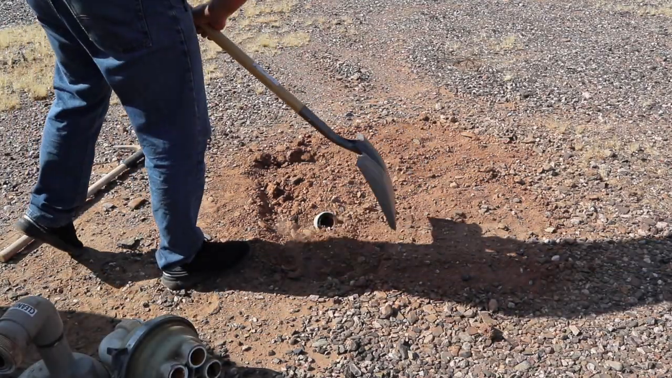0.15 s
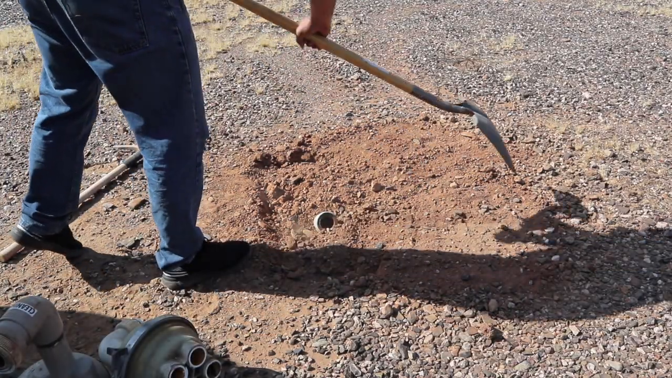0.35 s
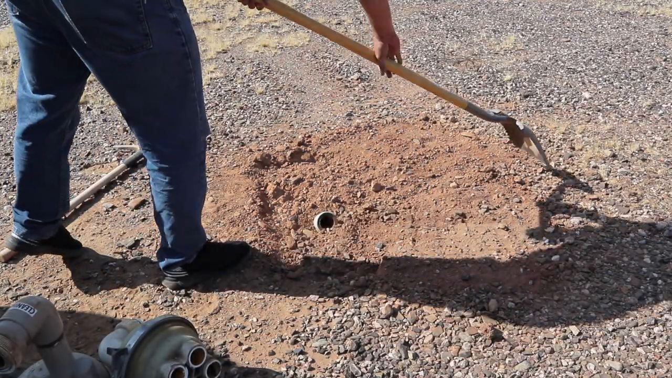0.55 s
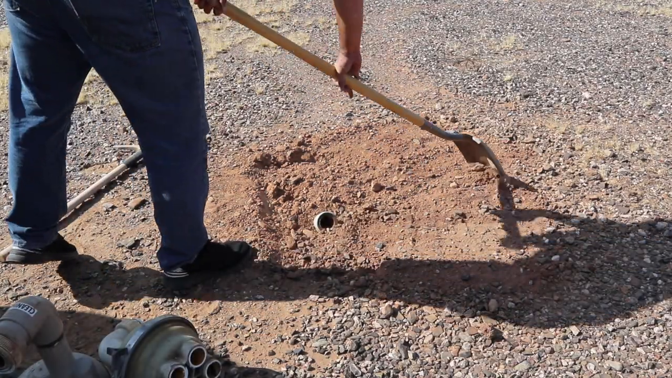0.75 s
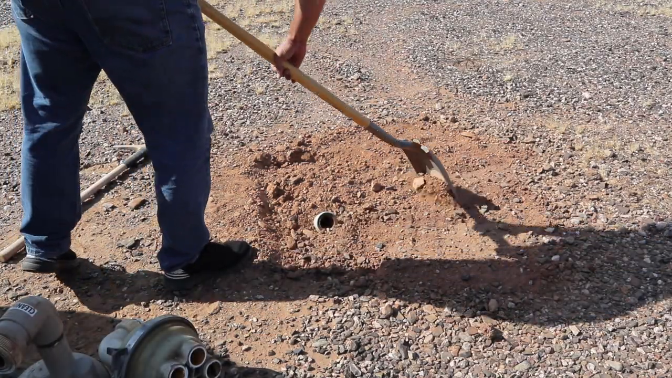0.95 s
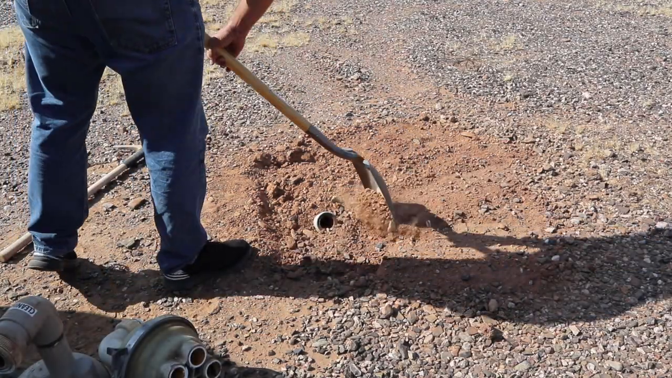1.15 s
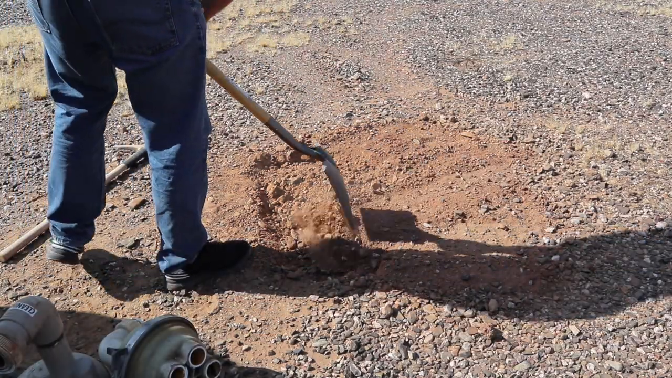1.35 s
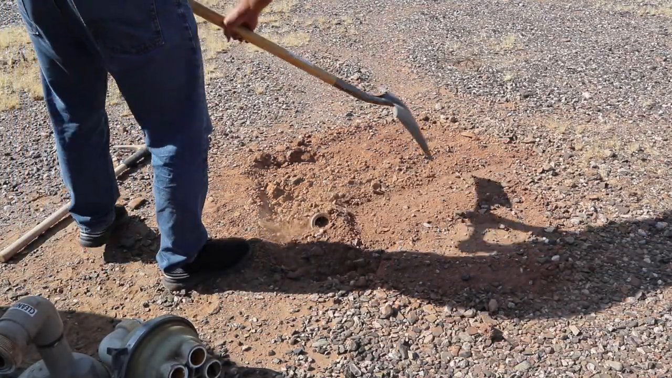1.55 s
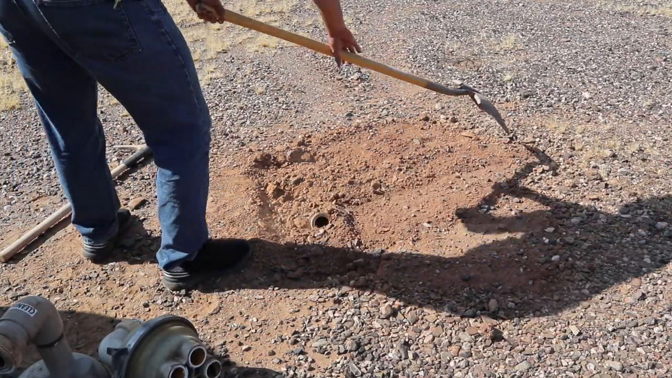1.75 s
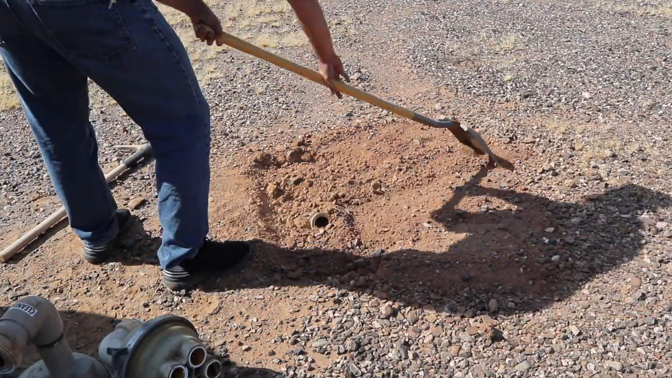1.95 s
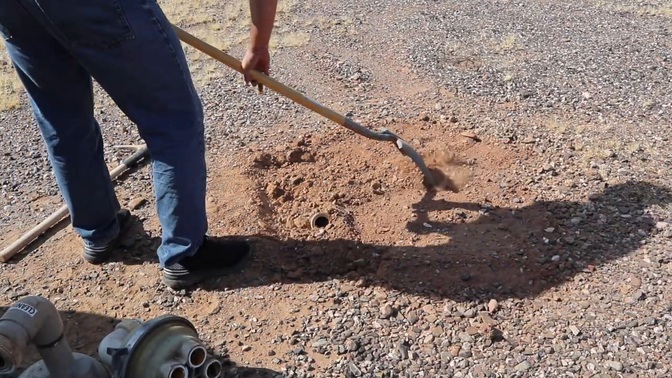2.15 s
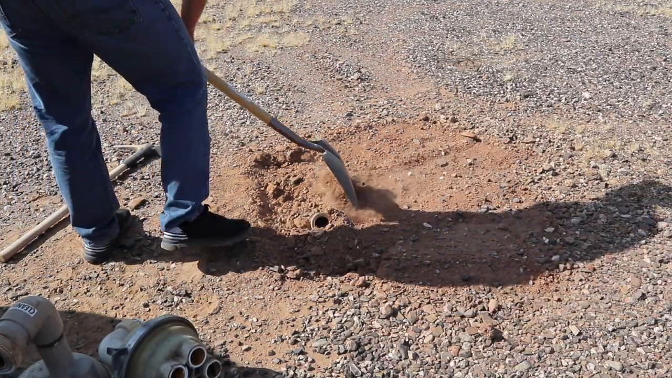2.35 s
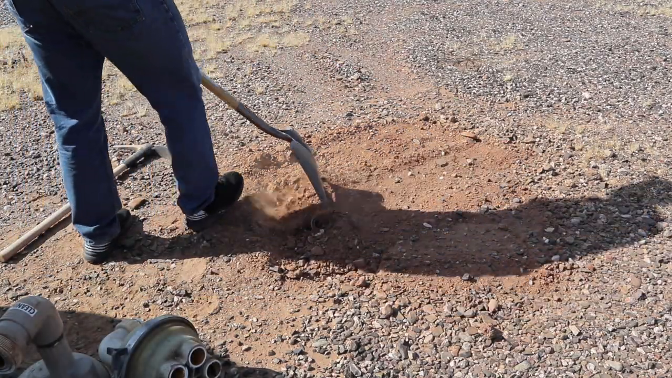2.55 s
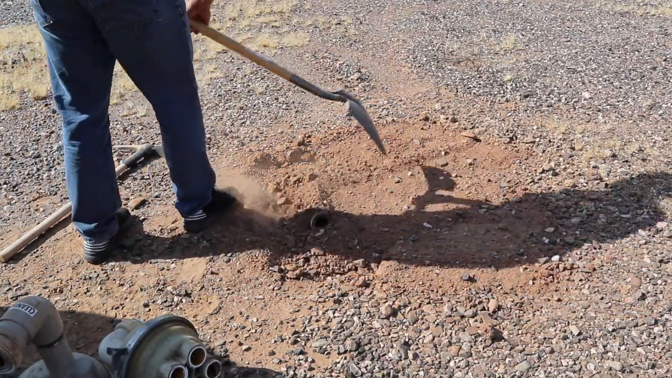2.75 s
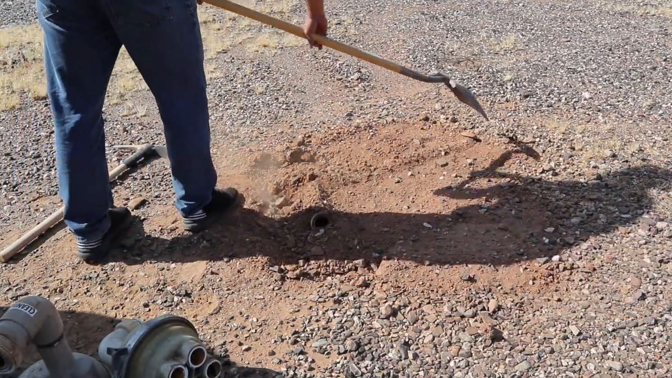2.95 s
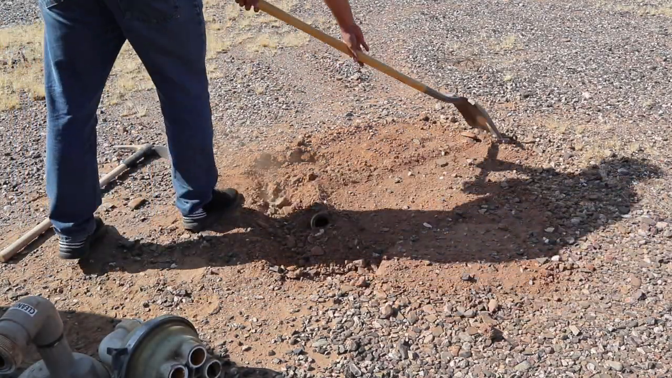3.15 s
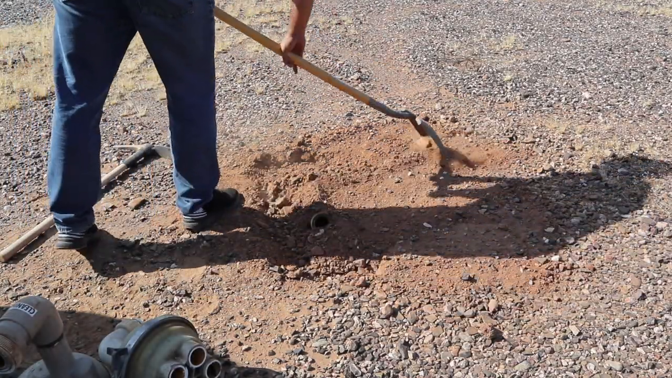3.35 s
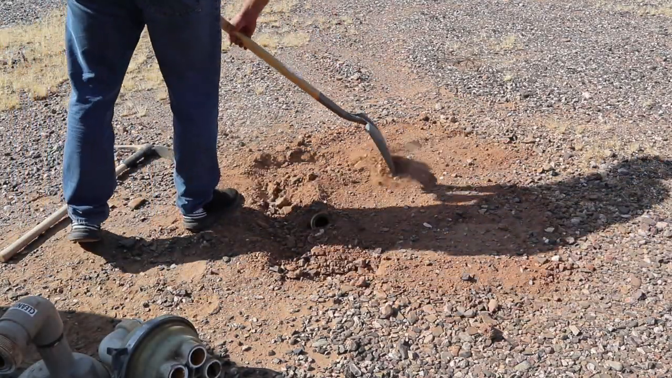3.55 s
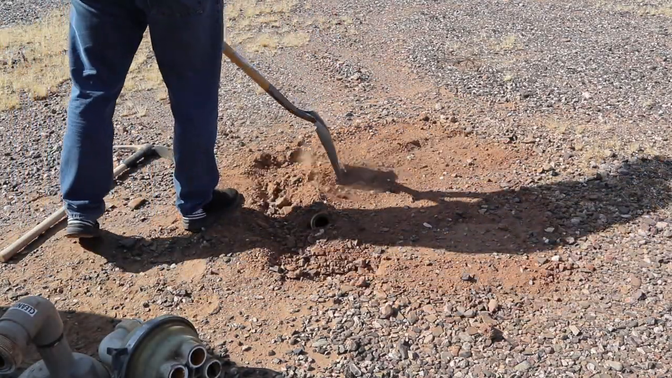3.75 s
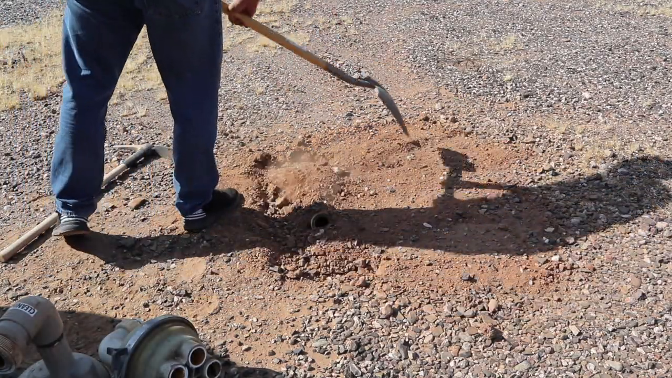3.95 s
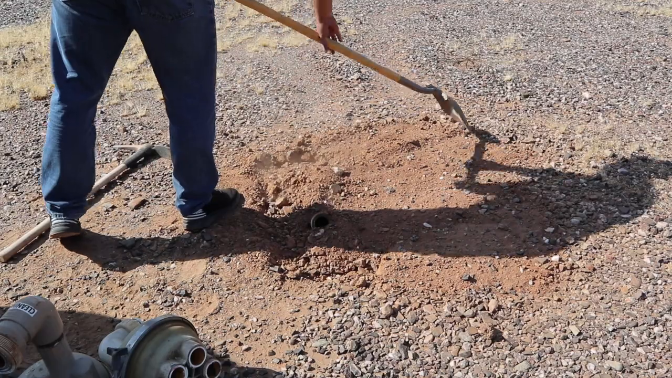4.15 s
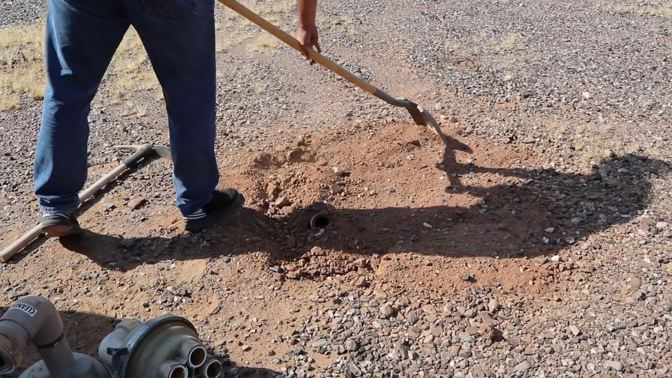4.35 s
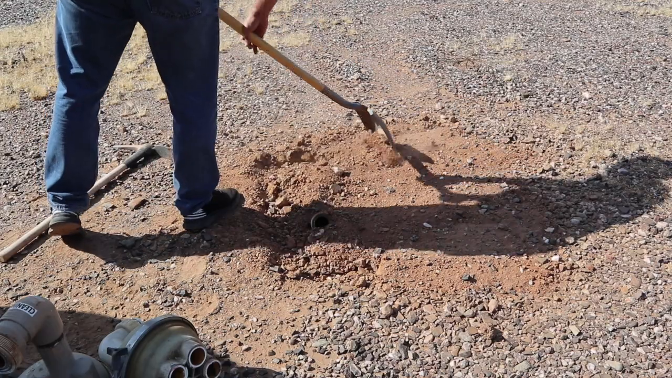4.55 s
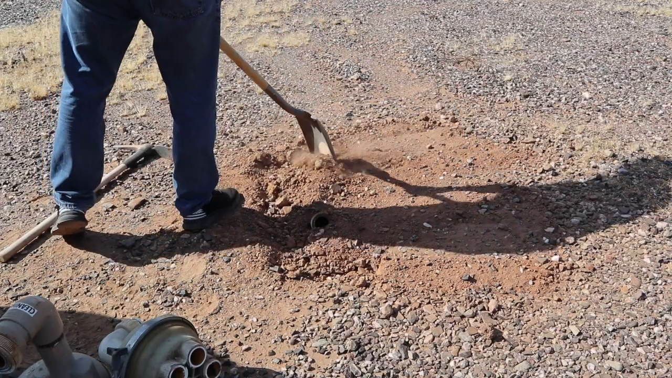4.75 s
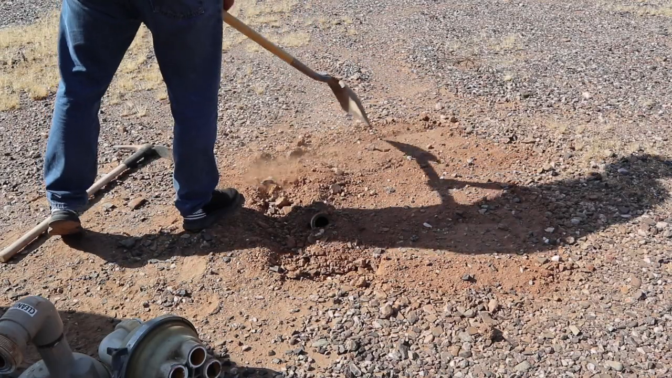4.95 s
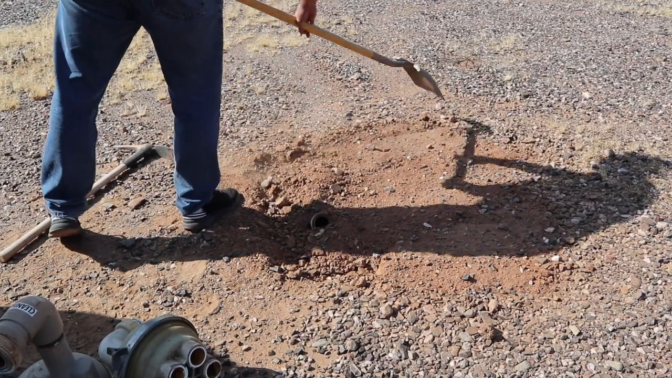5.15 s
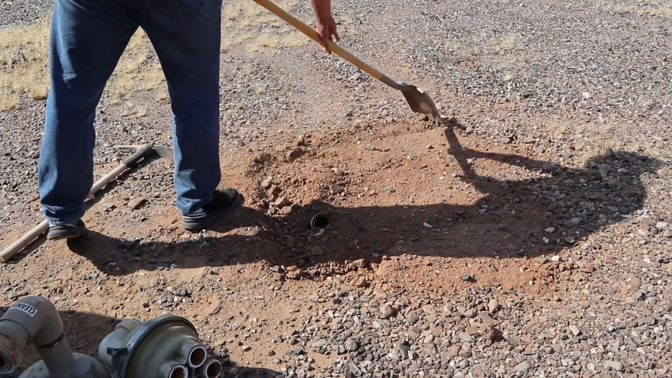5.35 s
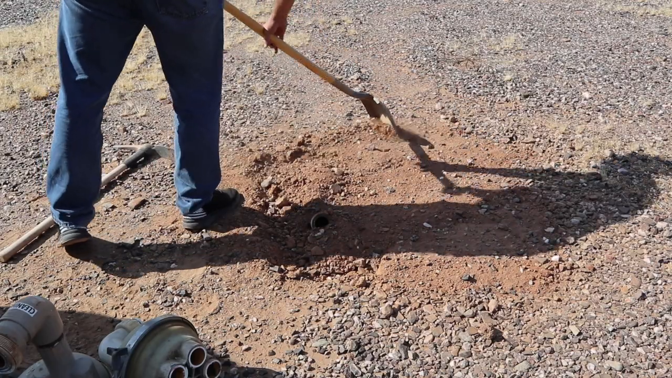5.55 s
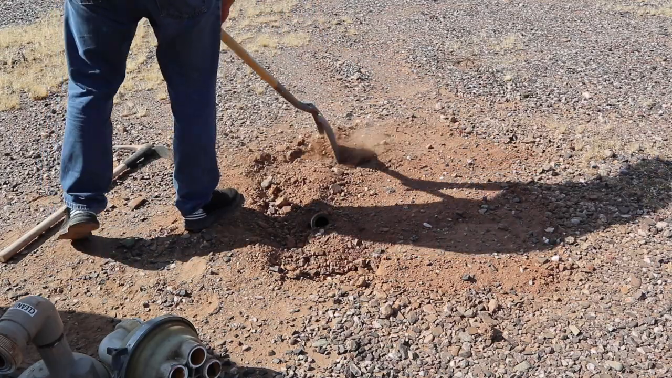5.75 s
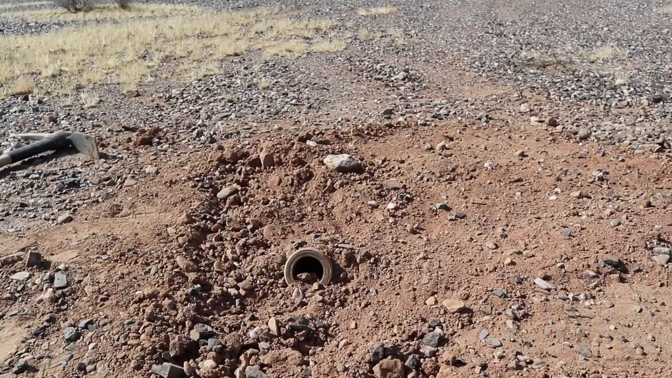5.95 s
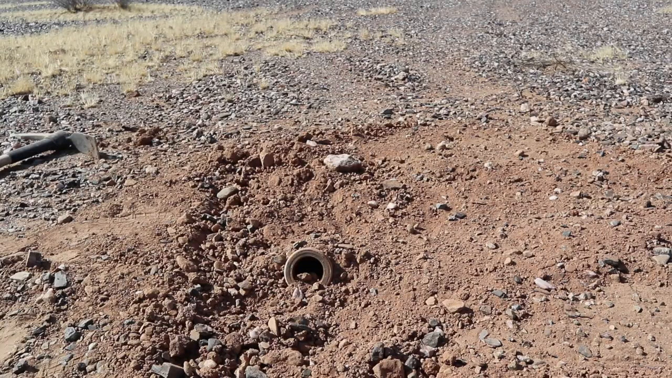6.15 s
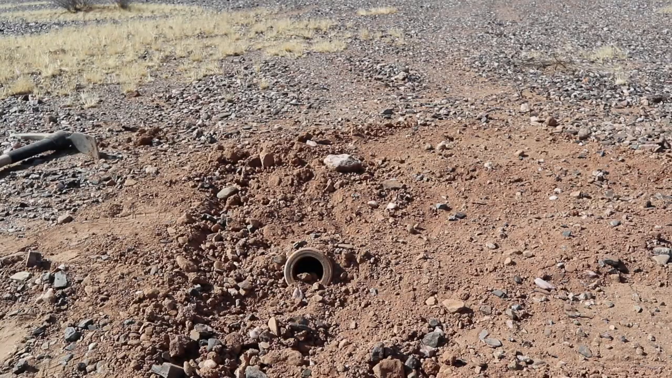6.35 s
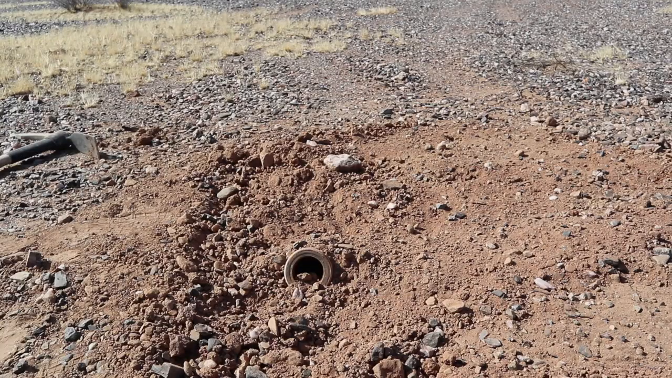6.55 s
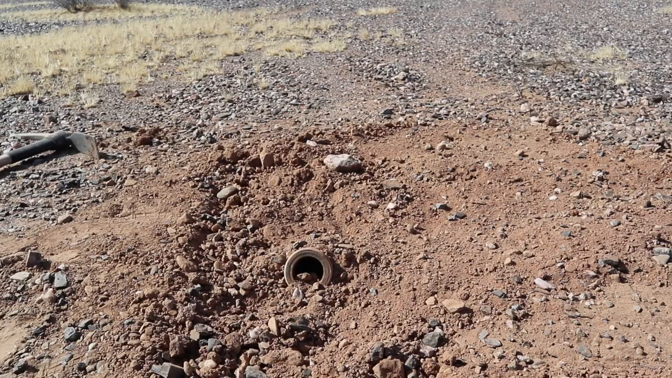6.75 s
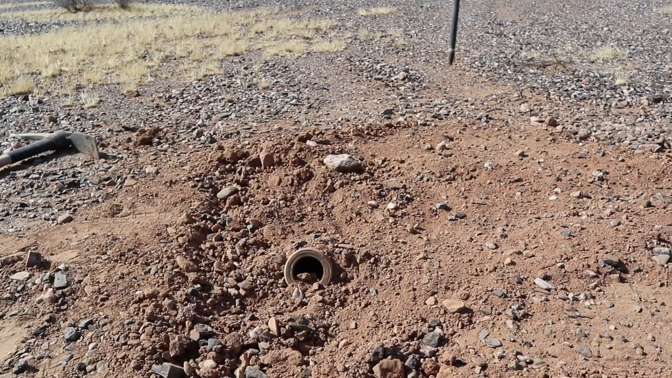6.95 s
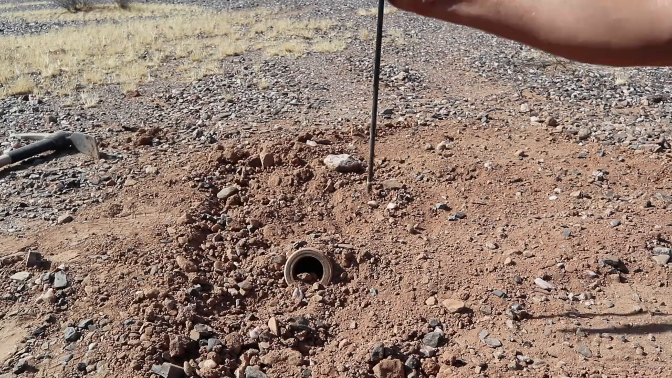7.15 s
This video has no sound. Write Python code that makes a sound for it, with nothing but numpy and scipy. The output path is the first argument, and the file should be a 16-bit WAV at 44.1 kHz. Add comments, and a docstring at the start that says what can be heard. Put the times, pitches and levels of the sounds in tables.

```python
"""Outdoors, a small two-port microphone close to a steel shovel in gravelly dirt. One drag is just ending,
then five more follow: grit rasps on the damped blade and stones jolt it. Between drags pebbles trickle
down, and three times a knock rings the lifted blade. Wind buffets the ports, hardest near 3 s and from
6 s on. At the end, from a new place, a thin rod is pushed into the dirt with a duller crunch."""
import sys
import numpy as np
from scipy import signal
from scipy.fft import rfft, irfft, next_fast_len
from scipy.io import wavfile
from scipy.ndimage import uniform_filter1d

SR = 44100
rng = np.random.default_rng(int(sys.argv[2]) if len(sys.argv) > 2 else 0)


def wav_out(sig):
    """Save sig, one row per channel (or a flat mono array), as 16-bit PCM at SR to the path in sys.argv[1]."""
    wavfile.write(sys.argv[1], SR, np.round(np.clip(np.atleast_2d(sig).T, -1, 1) * 32767).astype(np.int16))


N = 321489
T = np.arange(N) / SR

# drags through the dirt: touch_s, lift_s, first_rasp_db, last_rasp_db, trickle_db, trickle_fade_db_per_s
STROKES = [(-.3, 0.172, -39, -57.5, -67.5, 9), (0.705, 1.375, -30.5, -49.5, -56, 8.5),
           (1.98, 2.427, -30.5, -46.5, -44.5, 50.5), (3.21, 3.614, -33.5, -48.5, -51, 52.5),
           (4.272, 4.852, -39.5, -39.5, -56.5, 45.5), (5.36, 5.928, -27.5, -39, -73, 63)]
# the edge biting hard ground: start_s, relative_db
BITES = [(0.711, 4), (1.9525, -17), (3.211, -7), (4.2817, 4), (5.367, 6), (5.615, -13.5)]
# the duller top at the new place: freq_hz, gain_db
DULL = [(5000, 1), (8500, 1), (10500, -8)]


def amp(db):
    return 10 ** (np.asarray(db) / 20)


def unit(x):
    return x / np.sqrt(np.mean(x ** 2))


def colour(x, table, turn=1):
    """Equalise by (freq_hz, gain_db) points; turn rotates the phase."""
    hz, db = np.transpose(table)
    size = next_fast_len(N)
    f = np.maximum(np.arange(size // 2 + 1) * SR / size, 1)
    gain = amp(np.interp(np.log(f), np.log(hz), db))
    return irfft(rfft(x, size) * turn * gain, size)[..., :N]


def band(x, lo_hz, hi_hz):
    return signal.sosfilt(signal.butter(2, [lo_hz, hi_hz], "bandpass", fs=SR, output="sos"), x)


def ring(x, hz, width_hz):
    """One resonance, gain 1 at its centre."""
    return signal.lfilter(*signal.iirpeak(hz, hz / width_hz, fs=SR), x)


def flicker(rate, depth_db):
    """Gain that jumps about rate times a second."""
    hold = int(SR / rate)
    steps = np.repeat(rng.standard_normal(N // hold + 1), hold)[:N]
    return unit(amp(depth_db * uniform_filter1d(steps, hold // 2)))


def bursts(times, peak_db, t60_s, swell_s):
    """Envelope of events that swell up to their moment and die away; powers add."""
    power = np.zeros(N)
    for s, db, fall, rise in np.broadcast(times, peak_db, t60_s, swell_s):
        i = np.arange(max(int((s - .04) * SR), 0), min(int((s + 0.282) * SR), N))
        t = T[i] - s - .001
        power[i] += (amp(db - 60 * np.maximum(t, 0) / fall) * np.exp(np.minimum(t, 0) / rise)) ** 2
    return np.sqrt(power)


def shovel(grit):
    """Rasp, chips and bites drive the blade, which the dirt damps to broad resonances."""
    # resonances of the blade in the dirt: pitch_hz
    pressed_hz = [540, 720, 1580, 1990, 2900, 3590, 4250]
    # the same resonances: width_hz, gain_db
    pressed = [(75.8, 5), (110.6, 2), (130, 2.5), (89, -2), (149.7, -1), (267, 4), (151, -18.5)]
    rasp, trickle = drag()
    slip = flicker(110, 1.6) * flicker(30, 2.2)
    drive = chips(rasp * slip) + scrape(grit, rasp, trickle, slip) + bites()
    # the point of contact wanders along the edge, so each resonance is woken in its own fits
    blade = sum(amp(db) * ring(drive * flicker(35, 5.3), hz, width_hz)
                for hz, (width_hz, db) in zip(pressed_hz, pressed))
    return amp(2) * drive + amp(-3.5) * blade


def drag(dig_in_s=0.092, lift_t60_s=0.15):
    """Two envelopes: the rasp builds, sags as the load piles up and dies at the lift; dirt trickles on."""
    rasp, trickle = 0, 0
    for touch, lift, first_db, last_db, trickle_db, fade in STROKES:
        dug_in = np.clip((T - touch) / dig_in_s, 0, 1)
        lifted_s = np.maximum(T - lift, 0)
        rasp_db = np.interp(T, [touch, lift], [first_db, last_db])
        rasp = rasp + dug_in * amp(rasp_db - 60 * lifted_s / lift_t60_s)
        trickle = trickle + dug_in * amp(trickle_db - fade * lifted_s)
    return rasp, trickle


def gravel(q, rate, scatter_db, rustle_db):
    """Stones of many sizes click and ring briefly over a fine rustle; two unrelated streams."""
    stones = 0
    for hz in 250 * 2 ** np.arange(0, 6, 1 / 6):
        khz = hz / 1000
        count = int(rate * np.sqrt(khz) * N / SR)  # small stones are many
        hits = np.zeros((2, N))
        for row in hits:
            size_db = scatter_db * np.minimum(rng.exponential(size=count), 3)
            row[rng.integers(0, N, count)] = amp(size_db) / khz ** 0.35
        stones = stones + ring(hits, hz, hz / (q * khz ** 0.013))
    return amp(rustle_db) * rng.standard_normal((2, N)) + unit(stones)


def scrape(grit, rasp, trickle, slip):
    """Grit slides on the steel as thud, midrange and hiss; larger stones catch the edge and jolt it."""
    # stones catching the edge: time_s, relative_db, thud_over_mid_db, hiss_over_mid_db, t60_s
    jolts = [(.0044, -26.5, -12, -10, 0.11), (0.711, 1.5, -2, 2, 0.044), (0.74, -9, -9, -6, 0.26),
             (0.762, -7.5, -5, -1.5, 0.097), (0.7947, -8.5, -1.5, -10, 0.066),
             (0.804, -15.5, -17, 6, 0.082), (0.816, -13, -20, 1, 0.039), (0.866, -20.5, 0, -15, 0.067),
             (0.8969, -13.5, -3.5, -7, 0.051), (.92, -15.5, -6, -3, 0.063), (0.94, -14, -6.5, -8, 0.081),
             (0.969, -3.5, -2.5, -7.5, 0.091), (1.031, -14.5, -5, -5, 0.086), (1.062, -7.5, -4, -2, 0.051),
             (1.0913, -11.5, 0.5, -10, 0.061), (1.1843, -7.5, -5.5, -6, 0.056),
             (1.2192, -22.5, -14, -5, 0.067), (1.2885, -26.5, -7, -23, 0.33), (1.326, -32, 4.5, -17, 0.11),
             (1.681, -26, -1.5, -30, 0.11), (1.9056, -27, -32, -26, 0.031), (1.953, -10, -3, -6, 0.06),
             (1.961, -0.5, -9, 1.5, 0.081), (2.0266, -15.5, -2.5, -4, 0.14), (2.053, -11.5, -2, -1.5, 0.44),
             (2.127, -17.5, 3, -6, 0.16), (2.144, -5.5, -2, -6, 0.056), (2.1687, -10, 3, -7, 0.11),
             (2.191, -9, -8, -5, 0.052), (2.241, -16, -28, 3, 0.12), (2.2549, -4.5, 0, -3, 0.063),
             (2.294, -18.5, -11, 1, 0.16), (2.3267, -10.5, -17, -0.5, 0.043), (2.34, -12, 0, -2, 0.054),
             (2.6287, -31.5, 8, -5, 0.15), (3.149, -36, 0, -10, 0.27), (3.212, 0, -5, 0, 0.12),
             (3.2392, -8.5, -25, -0.5, 0.16), (3.299, -1.5, -30, -5.5, 0.11), (3.311, -6, -1.5, 2.5, 0.13),
             (3.4305, -27, 4, -1, 0.13), (3.471, -13, 4, -1.5, 0.088), (3.538, -13, -9, -10, 0.069),
             (3.553, -18.5, -3, -5, 0.059), (3.617, -15.5, -10, 2.4, 0.089), (3.646, -23.5, -20, 2, 0.087),
             (3.726, -28.5, -5, -6, 0.48), (3.7407, -28.5, -5, -13, 0.088), (3.7786, -18.5, -9, -7, 0.21),
             (3.809, -28, -8, 4, 0.11), (4.012, -37, -2, -14, 0.05), (4.034, -33, -11, -20, 0.08),
             (4.282, -3.5, -19, 2, 0.1), (4.2995, -5, -11.5, -2.5, 0.14), (4.3573, -24.5, 8.5, 8.5, 0.14),
             (4.4015, -28.5, 6, 3, 0.39), (4.441, -24.5, 3, -4, 0.099), (4.487, -26, 1, 1, 0.1),
             (4.5426, -13.5, -3.5, -6.5, 0.056), (4.566, -17, -7, 3, 0.061), (4.5753, -11, -7.5, -4, 0.096),
             (4.6135, -20, -14, 2, 0.061), (4.631, -11, -6, -8, 0.05), (4.662, -14, -2.5, -2.5, 0.06),
             (4.7217, -41, -15, 10, .06), (4.7487, -20, 2.5, 3, 0.045), (4.826, -7.5, -10, -11, 0.12),
             (4.871, -18.5, -5, 0.5, 0.12), (5.3674, -0.3, -4, 3.5, 0.094), (5.417, -17, -11.5, 2, 0.19),
             (5.443, -6, -1.5, 1.5, 0.044), (5.461, -15, -23, 3, 0.11), (5.536, -12.5, -8, 2, 0.27),
             (5.574, -11, 1, 2.5, 0.17), (5.6122, -5.5, -19, 0, 0.13), (5.659, -14.5, 1, 1, 0.058),
             (5.669, -8, -0.5, -8, 0.098), (5.7162, -20, 3, -14, 0.058), (5.742, -9.5, 2, -6, 0.076),
             (5.8068, -12.5, 2.5, 0, 0.04), (5.834, -17, -24, 3, 0.16)]
    # tone of grit on steel: freq_hz, gain_db
    grit_tone = [(88, -37), (150, -7), (531, -1.5), (609, -3), (711, 0.5), (1230, -4.5), (1990, 1.5),
                 (2620, -3.5), (10400, -6), (12900, -12.5), (15700, -49.5)]
    at, peak_db, thud_db, hiss_db, t60 = np.transpose(jolts)
    biting = np.abs(at[:, None] - np.array(BITES)[:, 0]).min(axis=1) < .004
    swell_s = np.where(biting, 0.00093, 0.0037)  # a bite is abrupt, other stones load up first
    grit = colour(grit, grit_tone)
    thud = colour(grit, [(900, 0), (1200, -6), (1600, -40)])
    hiss = colour(grit, [(3500, -40), (5000, -6), (6500, 0)])
    zones = [(thud, -8, -4.5, thud_db, 1.2),
             (grit - thud - hiss, 0, 0, 0, 1),
             (unit(hiss) * flicker(70, 1.73), -3.5, -5, hiss_db, .8)]  # treble dies first
    out = 0
    for part, rasp_db, trickle_db, jolt_db, t60_scale in zones:
        bed = np.hypot(amp(rasp_db) * rasp, amp(trickle_db) * trickle)
        jolting = bursts(at, peak_db + jolt_db - 15, t60_scale * t60, swell_s)
        out = out + unit(part) * np.hypot(bed * slip, jolting)
    return out


def chips(rasp, per_s=60, over_rasp_db=-8):
    """Small stones split under the blade, each with a very short bright crack."""
    # the loudest chips: start_s, strength_db
    loud_chips = [(5.5358, -15), (5.562, -13.5), (5.5694, -14), (5.585, -21)]

    def crack(hits):
        decay = signal.lfilter([1], [1, -np.exp(-1 / (.0004 * SR))], hits)
        noise = decay * rng.standard_normal((2, N))
        return colour(noise, [(1500, -30), (3000, -3), (11500, -3), (14500, -35)])

    small = (rng.random(N) < per_s / SR) * amp(4 * np.minimum(rng.exponential(size=N), 3))
    loud = np.zeros(N)
    for s, db in loud_chips:
        loud[int(s * SR)] = amp(db)
    return rasp * amp(over_rasp_db) * unit(crack(small)) + crack(loud)


def bites():
    """Steel meets stone: one hard crack each time."""
    out, t = np.zeros((2, N)), T[:400]
    for s, db in BITES:
        i = int(s * SR)
        crack = rng.standard_normal((2, len(t))) * np.exp(-t / 0.0014)
        out[:, i:i + len(t)] += amp(db - 17) * (band(crack, 1500, 10000) + 1.3 * ring(crack, 2300, 500))
    return out


def clanks():
    """A stone strikes the steel squarely: one damped blade tone with a fainter partner above it."""
    # square hits: start_s, relative_db, pitch_hz, t60_s
    strikes = [(0.7118, -1.5, 2010, 0.036), (0.7392, -13, 1984, 0.062), (0.7637, -4, 1990, 0.039),
               (0.7946, -10.5, 1710, 0.042), (0.8689, -18, 2040, 0.05), (0.9697, -22, 2040, 0.046),
               (1.0585, -15, 2360, 0.063), (1.1824, -16, 2080, 0.053), (1.9515, -6.5, 2070, 0.04),
               (1.9609, -14, 1880, 0.042), (2.0522, -9, 1774, 0.037), (2.142, -13.5, 1570, 0.079),
               (2.2528, -13.5, 2040, 0.074), (3.2141, -8, 2037, 0.11), (3.2984, -18, 1610, 0.05),
               (3.3124, -19, 1800, 0.05), (3.4695, -25, 1615, 0.05), (3.7754, -17, 1720, 0.036),
               (4.2812, -7, 2306, 0.037), (4.3001, -8.5, 1983, 0.065), (4.5735, -8.5, 1550, 0.034),
               (4.6304, -18, 2040, 0.059), (4.8274, -9.5, 2080, 0.098), (4.8688, -24, 1605, 0.084),
               (5.3692, -6.5, 1927, 0.057), (5.441, -7.5, 1544, 0.031), (5.5333, -7.5, 1610, 0.042),
               (5.5762, -9, 1580, 0.045), (5.6131, -6.5, 1542, 0.036), (5.6655, -13, 1930, 0.05)]
    out, t = np.zeros(N), T[:4000]
    attack = 1 - np.exp(-t / 0.00058)
    for (s, db, hz, t60), turn in zip(strikes, rng.random((len(strikes), 2))):
        i = int(s * SR)
        tone = np.sin(2 * np.pi * (hz * t + turn[0]))
        partner = 0.42 * np.sin(2 * np.pi * (1.63 * hz * t + turn[1]))
        out[i:i + len(t)] += amp(db - 5 - 60 * t / t60) * attack * (tone + partner)
    return out


def knocks():
    """A knock wakes the lifted blade's modes by where it lands; they stop on touching the dirt."""
    # knocks on the lifted blade: start_s, touch_down_s
    rings = [(2.626, 3.21), (3.82, 4.28), (4.845, 5.366)]
    # modes of the blade in the air: pitch_hz
    free_hz = [770, 874, 1003, 1188, 1658, 1707.5, 1712, 1810, 1985, 2046, 2112, 2732, 2864, 3045, 3215,
               3585, 3674, 4393]
    # the same modes: t60_s, first_knock_db, second_knock_db, third_knock_db
    free_modes = [(0.49, -61, -85.5, -39.5), (0.62, -82.5, -78, -36.5), (0.44, -78, -81, -40.5),
                  (.7, -74, -78, -44.5), (0.29, -68, -80, -29.5), (4.2, -48.5, -65.5, -53.5),
                  (2.2, -51.5, -77, -55.5), (0.45, -43.5, -77, -36), (0.65, -47, -43.5, -42.5),
                  (0.21, -42, -36, -65), (1.1, -45.5, -69, -50), (0.17, -34, -73, -60),
                  (0.44, -60, -45.5, -70), (0.93, -57, -66, -48.5), (0.32, -44, -46, -36.5),
                  (0.33, -41, -42.5, -49), (0.55, -68, -62, -46), (0.26, -73.5, -50, -73)]
    out = np.zeros(N)
    t60, *start_db = np.transpose(free_modes)[:, :, None]
    # a head start for the upper mode of the close pair sets when the two beat
    turns = .36 * (np.diff(free_hz, prepend=0) < 10)[:, None]
    for (s, end), db in zip(rings, start_db):
        i, t = int(s * SR), T[:int((end - s) * SR)]
        modes = amp(db - 60 * t / t60) * np.sin(2 * np.pi * (np.outer(free_hz, t) + turns))
        opening = 1 - np.exp(-t / 0.0093)  # dirt slides off
        out[i:i + len(t)] += opening * modes.sum(axis=0)
    return out


def pebbles(strays_per_lift=3):
    """Falling pebbles: a sharp click at each one's pitch, a weaker bounce, a thin ring of the steel."""
    # the louder landings: start_s, level_db, pitch_hz
    landings = [(.0485, -25, 3950), (.0846, -33, 3700), (.1224, -27.5, 5100), (.1403, -34, 3030),
                (1.329, -27, 1190), (1.49, -37, 5830), (1.595, -48, 4500), (1.62, -46, 4000),
                (1.681, -36.5, 2200), (1.716, -46, 3500), (1.814, -31.5, 4800), (2.8205, -22.5, 5350),
                (2.863, -33, 6000), (2.904, -38, 3760), (3.0176, -31.5, 7000), (3.061, -29.5, 8000),
                (3.1208, -39, 9000), (4.038, -37.5, 2700), (4.9547, -47, 10100), (4.9876, -26, 2150),
                (5.0858, -36.5, 5500), (5.1283, -43, 4970), (5.2719, -38, 13000), (5.3213, -40.5, 12770),
                (7.012, -28, 5500)]
    # high blade modes that a pebble wakes: pitch_hz, level_db, t60_s
    high_modes = [(5100, -17, 0.045), (7843, -15.5, .05), (10700, -15, 0.032), (12770, -14.5, .05)]
    out, t = np.zeros((2, N)), T[:3000]
    # small ones fall in the half second after each lift but the last
    strays = [(stroke[1] + .5 * when, -71 + 24 * size, 2800 * 2 ** pitch)
              for stroke in STROKES[:-1] for when, size, pitch in rng.random((strays_per_lift, 3))]
    mode_hz, mode_db, t60 = np.transpose(high_modes)[:, :, None]
    for s, db, hz in list(landings) + strays:
        i = int(s * SR)
        impact = np.exp(-t / 0.0023) * np.minimum(t / 0.00034, 1)
        since_bounce = t - .004 - 0.011 * rng.random()
        bounce = 0.45 * (since_bounce > 0) * np.exp(-np.abs(since_bounce) / 0.0014)
        noise = rng.standard_normal((2, len(t))) * (impact + bounce)
        click = band(0.046 * noise + ring(ring(noise, hz, 1.4 * hz), hz, 1.4 * hz), 1200, 12000)
        near_db = -9 * np.abs(np.log2(mode_hz / hz))  # modes close to the pebble's pitch answer best
        steel = np.sum(amp(mode_db + near_db - 60 * t / t60) * np.sin(2 * np.pi * mode_hz * t), axis=0)
        out[:, i:i + len(t)] += amp(db) * (click / np.abs(click).max() + steel)
    return out


def rod(grit):
    """Packed dirt crumbles round the tip; its hollow crunch shifts as the rod sinks."""
    # the rod entering the dirt: time_s, level_db, crunch_hz, relative_treble_db
    push = [(6.78, -70, 743, 0.5), (6.826, -48, 1030, 0.5), (6.952, -43, 601, -16.5),
            (7.132, -35, 1110, -17), (7.29, -39.5, 970, -32)]
    # clods breaking under it: start_s, relative_db
    clods = [(6.854, -20), (6.884, -17), (6.905, -18.5), (6.941, -22.5), (7.012, -6), (7.029, -12.5),
             (7.072, -12), (7.102, -11), (7.134, -12.5), (7.143, -21), (7.212, -11.5), (7.2259, -7.5),
             (7.25, -11), (7.273, -16.5)]
    # tone of the dirt round the rod: freq_hz, gain_db
    crumb_tone = [(180, -31.5), (300, 0.5), (402, -6.5), (884, -6), (1560, -4), (1800, -3), (8810, -27.5),
                  (12000, -44), (15600, -70), (22000, -120)]
    s, db, hz, treble_db = np.transpose(push)
    at, peak_db = np.transpose(clods)
    bed = amp(np.interp(T, s, db, left=-150)) * flicker(120, 2.1)
    grit = colour(grit, crumb_tone)
    crunch_hz = np.interp(T, s, hz)
    body = 0.47 * unit(grit) + amp(np.interp(T, s, treble_db)) * unit(band(grit, 1100, 8400))
    for f in 500 * 2 ** np.arange(0, 2.3, .25):
        nearness = np.exp(-(np.log2(f / crunch_hz) / 0.42) ** 2)
        body = body + 0.64 * unit(ring(grit, f, f / 4)) * nearness
    out = body * np.hypot(bed, bursts(at, peak_db - 16.5, t60_s=0.095, swell_s=.0006))
    t = T[:600]
    snap = 1.7 * (1 - np.exp(-t / 0.00083)) ** 2 * np.exp(-t / 0.0022)  # a clod gives way
    for when, size_db, turn in zip(at, peak_db, rng.random(len(at))):
        i = int(when * SR)
        hollow = np.sin(2 * np.pi * (np.interp(when, s, hz) * t + turn))
        out[0, i:i + len(t)] += amp(size_db - 5.5) * snap * hollow
    return colour(out, DULL)


def wind(eddies_per_s=22, eddy_hz=196.4):
    """Wind on the ports: a lumpy rumble, and eddies that pop for about one cycle."""
    # gusts: time_s, level_db
    gusts = [(0.0, -63), (.45, -52), (.73, -46.5), (.89, -58.5), (1.52, -49), (2.39, -52), (2.54, -45),
             (2.62, -30), (2.8, -31.5), (3.19, -34), (3.41, -54), (4.3, -57), (4.9, -47), (5.4, -47.5),
             (5.79, -53.5), (6.01, -37), (6.13, -37.5), (6.35, -46.5), (6.5, -38.5), (6.84, -38.5),
             (7.0, -42), (7.29, -34)]
    # tone of the rumble: freq_hz, gain_db
    rumble_tone = [(15, -58), (25, -17.5), (85, 2), (173, 0.5), (210, -4.5), (259, -3.5), (445, -10),
                   (900, -22.5), (1170, -42.5), (1980, -120)]
    # the stronger eddies: time_s, level_db, pitch_hz, left_minus_right_db
    strong_eddies = [(.523, -32, 147, 0.5), (.538, -32, 148, 0.5), (.676, -34.5, 282, 1),
                     (1.533, -36.5, 151, 3), (1.764, -34, 293, -3), (1.843, -28, 149, 1.5),
                     (2.594, -13, 228, 5), (2.635, -13.5, 173, 2.5), (2.65, -15, 436, 13),
                     (2.682, -15.5, 179, 3), (2.718, -14.5, 218, 5.5), (2.77, -9.5, 198, 5),
                     (2.8, -16.5, 179, 3.5), (2.846, -16.5, 257, 5.5), (2.866, -23, 280, 2.5),
                     (2.885, -10, 314, 3.5), (2.902, -17.5, 310, 5.5), (2.957, -22.5, 200, 4),
                     (2.975, -12, 260, 4.5), (3.003, -12, 292, 3), (3.012, -13.5, 297, 0),
                     (3.027, -18, 170, -2), (3.053, -15.5, 169, 2.5), (3.072, -17, 172, 1.5),
                     (3.105, -18, 244, 2), (3.135, -16.5, 138, 2.5), (5.966, -18.5, 167, 0),
                     (5.984, -22, 201, -2), (6.038, -17, 301, 1), (6.05, -21, 305, 0),
                     (6.058, -5, 407, 1.5), (6.097, -17, 186, 2), (6.432, -19.5, 159.7, -3),
                     (6.498, -22.5, 220, -0.5), (6.509, -25, 250, 1.5), (6.521, -22.5, 310, 0),
                     (6.536, -19, 259, -0.5), (6.551, -15, 307, 1.5), (6.582, -28, 169, 1.5),
                     (6.625, -25, 169, 0), (6.648, -17.5, 164, 2), (6.664, -16.5, 168, -1.5),
                     (6.697, -30, 160, 0.5), (6.712, -28.5, 150, 1), (6.753, -17, 228, 1),
                     (6.786, -18, 182, -1.5), (6.812, -21.5, 246, -0.5), (6.84, -19.5, 152, 1.5),
                     (6.863, -16.5, 144, 1), (6.918, -19, 180, 0)]
    lumps = .5 + flicker(50, 5.5)
    mid, side = unit(colour(rng.standard_normal((2, N)) * lumps, rumble_tone))
    side = colour(side, [(60, -43), (200, -29.5), (700, -5)])
    rumble = amp(np.interp(T, *np.transpose(gusts))) * np.array([mid + side, mid - side])
    when, pitch = rng.random((int(eddies_per_s * N / SR), 2)).T
    when = .05 + when * (N / SR - .1)
    gust_db = np.interp(when, *np.transpose(gusts))
    eddy_db = gust_db + 6 - 0.39 * np.maximum(-37 - gust_db, 0)  # in a lull they sink below the rumble
    weak_eddies = zip(when, eddy_db, eddy_hz * 2 ** (2 * pitch - 1), np.zeros_like(when))
    pops, t = np.zeros((2, N)), np.arange(-1000, 1000) / SR
    for s, db, hz, pan_db in list(strong_eddies) + list(weak_eddies):
        pop = np.exp(-(t * hz / 0.48) ** 2) * np.cos(2 * np.pi * (hz * t + rng.random()))
        i = int((s + 0.00383) * SR) - 1000
        pops[:, i:i + len(t)] += amp(db + np.array([[pan_db], [-pan_db]]) / 2) * pop
    pops = colour(pops, [(40, -11), (130, 0)])  # the capsule loses the slowest push
    lean = colour((pops[0] - pops[1]) / 2, [(50, -23.5), (220, -0.5)])  # deep bass reaches both alike
    return rumble + pops.mean(axis=0) + np.array([lean, -lean])


def air(moved_s=5.96):
    """Far hiss of the open yard, wider toward the treble, duller at the new place; two faint rustles."""
    # tone of the hiss: freq_hz, gain_db
    hiss_tone = [(180, -25), (300, -25.5), (359, -0.5), (403, -13), (691, -1.5), (1250, -2.5),
                 (10600, -25.5), (12700, -41.5), (15000, -63)]
    # its course: time_s, level_db
    hiss_levels = [(0, -60.5), (3.0, -52.5), (4.2, -62), (5.9, -52.5), (6.1, -55.5), (7.29, -55.5)]
    # its stereo width: freq_hz, side_over_mid_db
    width = [(300, -20), (700, -11), (1300, -5.5), (2400, 4), (8000, 6), (15000, 9.5)]
    # bright rustles: centre_s, level_db, half_length_s
    rustles = [(6.332, -58, 0.033), (6.852, -61, 0.032)]
    hiss = unit(colour(rng.standard_normal((2, N)), hiss_tone))
    hiss = amp(np.interp(T, *np.transpose(hiss_levels))) * np.where(T < moved_s, hiss, colour(hiss, DULL))
    swell = sum(amp(db) * np.exp(-((T - s) / half) ** 2) for s, db, half in rustles)
    rustle = swell * flicker(200, 3) * unit(band(rng.standard_normal((2, N)), 4000, 10800))
    mid, side = hiss + rustle
    side = colour(side, width)
    return np.array([mid + side, mid - side])


def ports(pair, wide_db, lag_share):
    """Close ports agree in the bass; the treble differs by a lag (right leads) and by scattered paths."""
    # difference between the ports against their sum: freq_hz, relative_db
    difference = [(60, -32), (110, -24.5), (200, -36.5), (380, -40.5), (700, -42.5), (1290, -33),
                  (2380, -12), (4400, -1), (8120, 5.5), (15000, 8.5)]
    mid, diffuse = pair
    lagged = colour(lag_share * mid, difference, turn=-1j)
    scattered = colour(np.sqrt(1 - lag_share ** 2) * diffuse, difference)
    side = amp(wide_db) * (lagged + scattered)
    return np.array([mid + side, mid - side])


def scene():
    """The close shovel, then the rod in a wider image, over wind and open air."""
    grit = gravel(q=22, rate=110, scatter_db=4, rustle_db=-.5)
    near = ports(shovel(grit) + pebbles() + knocks() + clanks(), wide_db=-8, lag_share=0.56)
    return near + ports(rod(grit), wide_db=7, lag_share=.75) + wind() + air()


def record(dry, top_hz=15843):
    """The recorder clips on the loudest jolts and cuts the top."""
    lowpass = signal.ellip(8, .2, 70, top_hz, fs=SR, output="sos")
    return signal.sosfilt(lowpass, np.clip(dry, -1, 1))


dry = scene()
out = record(dry)
wav_out(out)
```